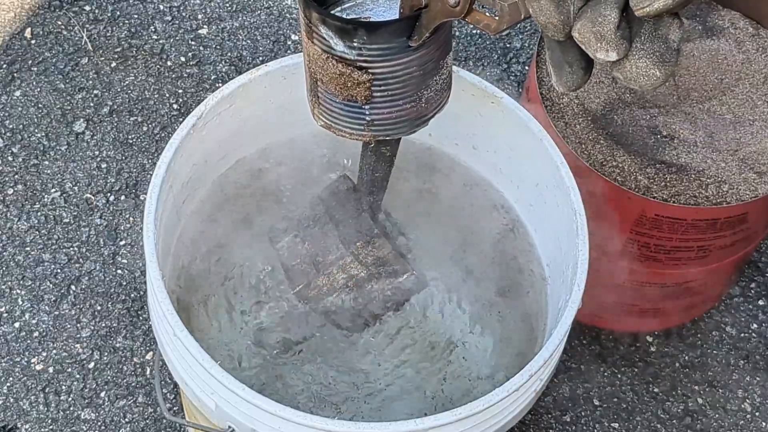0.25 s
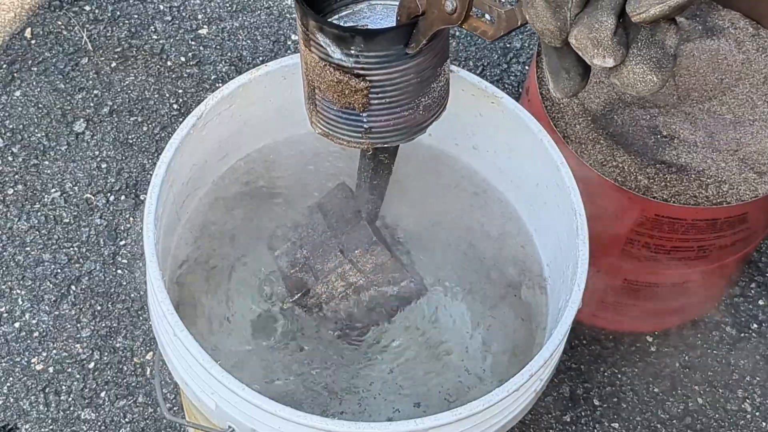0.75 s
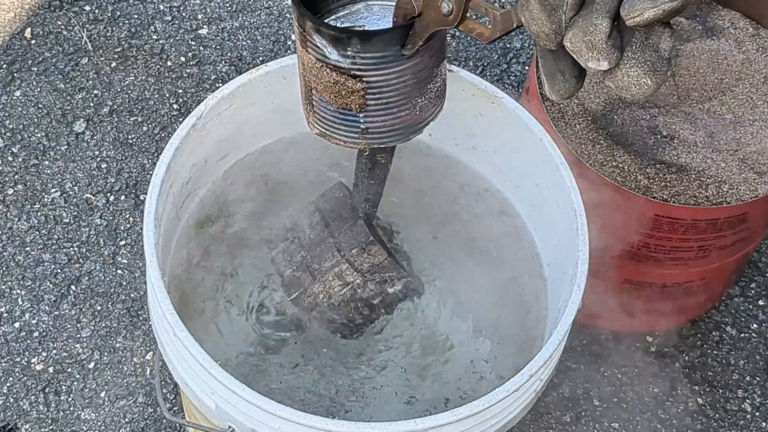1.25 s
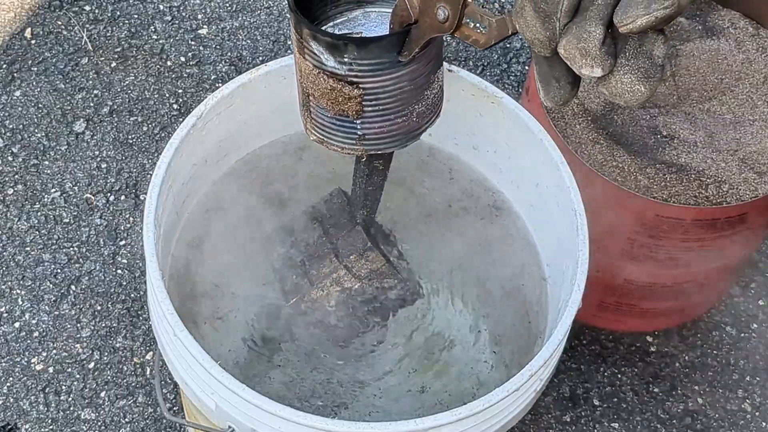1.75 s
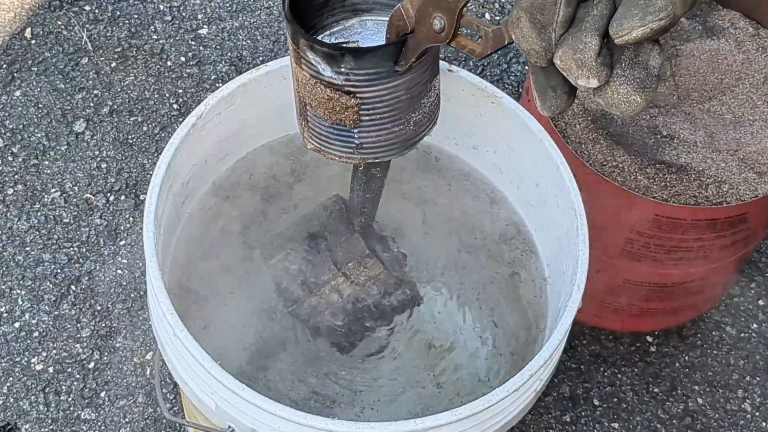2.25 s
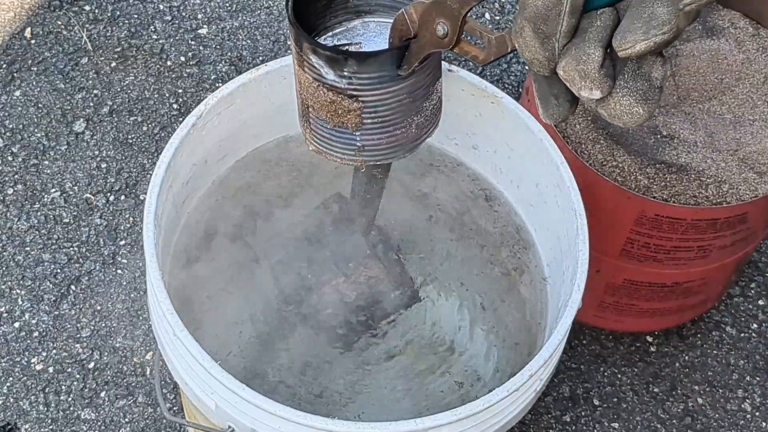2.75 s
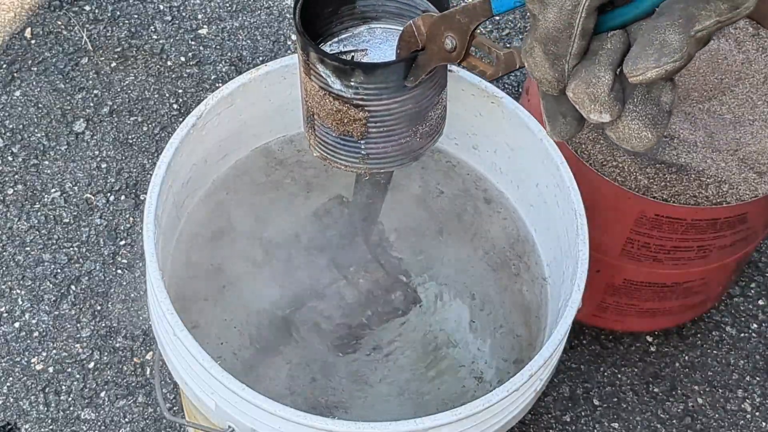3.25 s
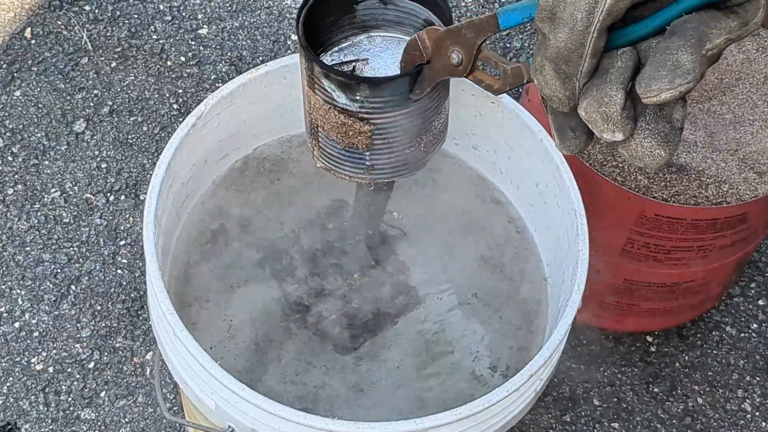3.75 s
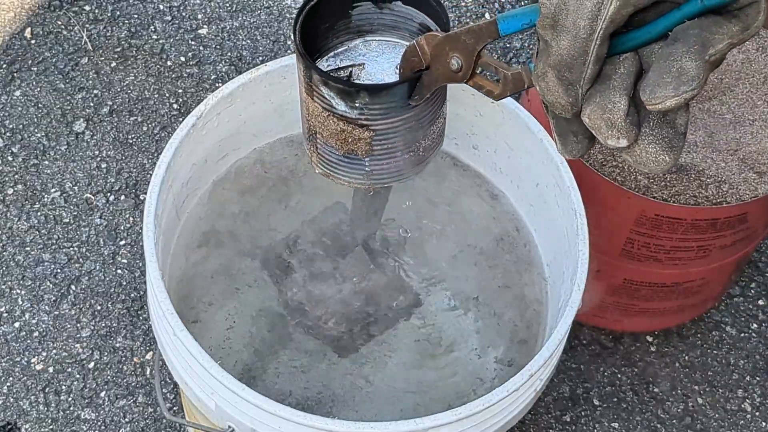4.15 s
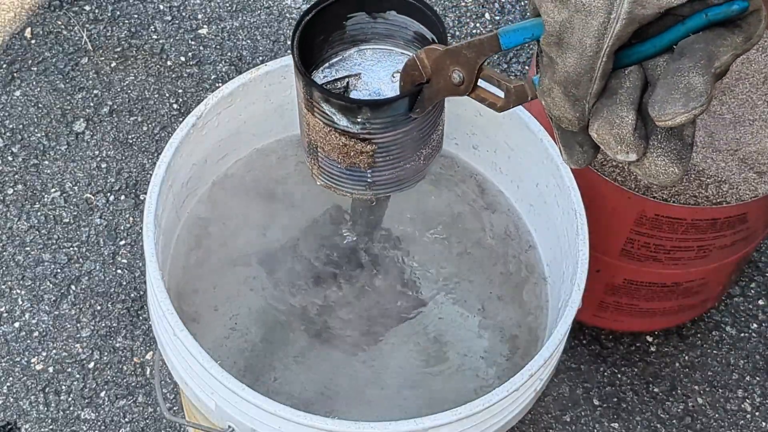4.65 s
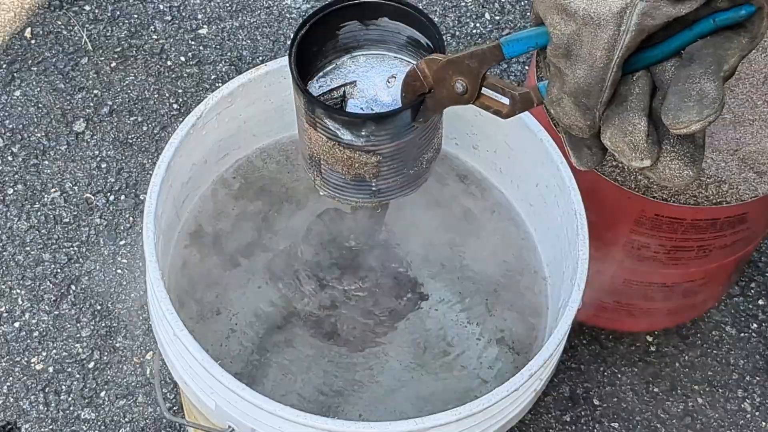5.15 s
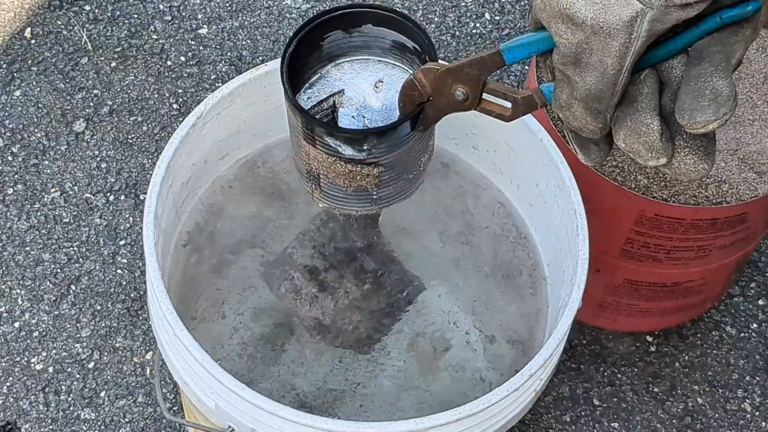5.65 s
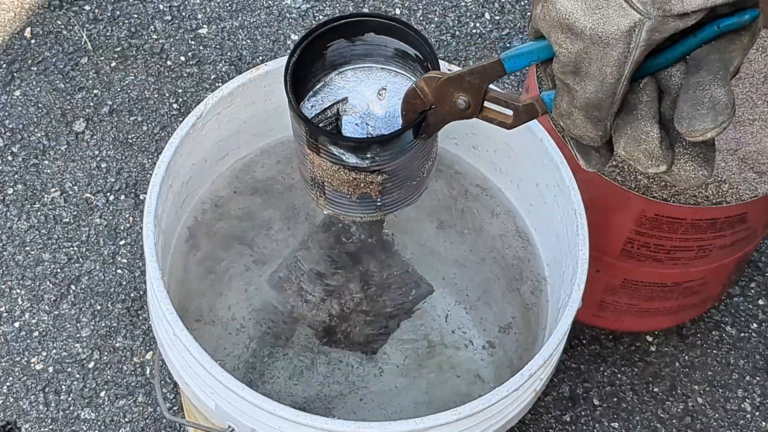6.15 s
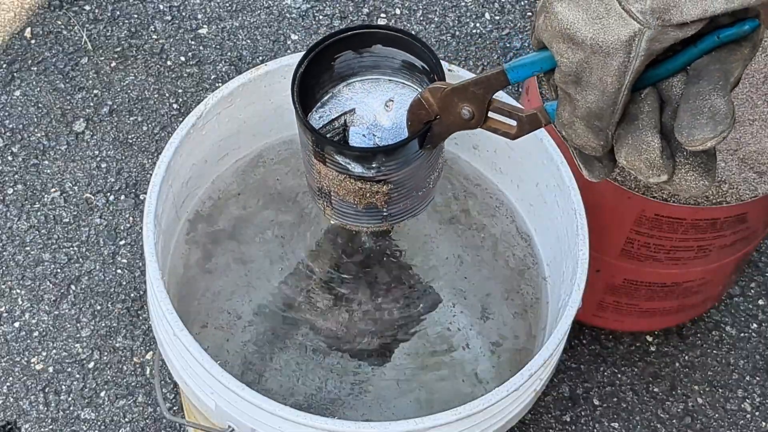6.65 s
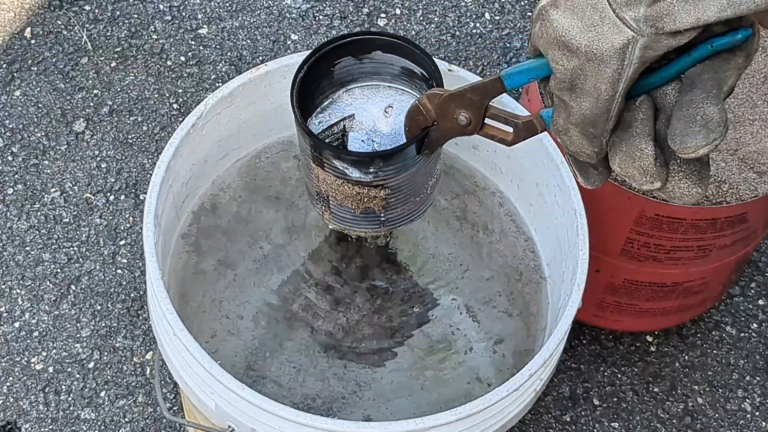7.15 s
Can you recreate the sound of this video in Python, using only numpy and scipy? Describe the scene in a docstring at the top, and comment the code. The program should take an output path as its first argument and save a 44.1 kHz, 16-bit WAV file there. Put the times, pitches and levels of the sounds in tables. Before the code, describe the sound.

From 0 s a hot metal casting in a plastic bucket of water gives a strong, bright, steady sizzle, trembling rapidly, with finer mist on top and coarser frying beneath. A hollow bucket resonance colours it, and soft low bubble knocks come at about 0.1, 0.7, 0.9 and 1.6 s, with a sharp spit near 0.4 s. From 2 to 4.3 s steam spurts, knocks and short gurgles crowd in, strongest around 2.7 and 3.2 s, while the hiss slowly weakens. Wet pops cluster at 4.6 to 4.8 s. The boiling then falls quickly to a thin, singing simmer, quietest near 5.8 s. From 6 s it picks up again, coarser, with raspy sputters, brief stalls, gurgles and pops until a steam burst at 7.4 s. Close, dry stereo outdoors, with faint low rumble, wavering drone and breeze.

```python
"""A bright, fluttering sizzle comes first: a very hot metal casting is held in a plastic bucket of water
outdoors, heard from just above. Countless tiny steam bubbles collapse on it, made from filtered random clicks.
Larger bubbles knock, gurgle, pop and ring the air in the bucket; short bursts of steam and a faint yard join in.
The boiling dies down, then picks up again, more sputtering, as the casting is shifted."""
import sys
import numpy as np
from scipy import signal
from scipy.fft import rfft, irfft
from scipy.io import wavfile
from scipy.ndimage import map_coordinates

SR = 44100
rng = np.random.default_rng(int(sys.argv[2]) if len(sys.argv) > 2 else 0)


def transcribe(u):
    """Save the signal u as a 16-bit wav file named by the first command-line argument.

    u: samples, shape (n,) or (channels, n), limited to [-1, 1]; the rate is SR.
    q: integer samples, one column per channel.
    """
    v = np.clip(np.atleast_2d(u).T, -1, 1)
    q = np.round(v * 32767).astype(np.int16)
    wavfile.write(sys.argv[1], SR, q)


N = 326340
TIME = np.arange(N) / SR
FREQ = np.maximum(np.fft.rfftfreq(N, 1 / SR), 1)
SIDES = np.array([[.5], [-.5]])  # shares out a left-minus-right difference

# In all tables, a half length is the spread (standard deviation) of a bell-shaped swell.
# Boiling as the casting cools and is shifted; coarseness is how far large bubbles gain on tiny ones:
# t/s, vigour/dB, coarseness/dB
BOILING = [(0, 0.0, 2), (1.1, -0.5, 0), (1.4, -0.6, -2), (2.3, -0.6, 1.1), (2.8, -2, 2), (3.3, -3, 0.8),
           (3.95, -4, 3.5), (4.2, -5.5, 2.5), (4.48, -6.5, 2.2), (4.6, -5, 3), (5.0, -7, 4.5),
           (5.25, -10, 2.5), (5.8, -14, 2.5), (6.03, -10, 3), (6.1, -9, 2), (6.3, -6.5, 4.5),
           (6.78, -7, 6.5), (7.05, -5, 7.5), (7.4, -7.5, 5)]
# Stalls, when steam blankets the metal for an instant: t/s, half length/s, change of vigour/dB
STALLS = [(1.744, 0.012, -2), (2.574, 0.012, -2), (2.783, 0.014, -1.5), (2.908, 0.0064, -1.5),
          (3.053, 0.0067, -1.5), (3.105, .008, -1.5), (3.763, 0.008, -0.5), (3.98, 0.009, -0.5),
          (4.58, .004, -1.5), (4.642, .008, -2.5), (4.772, .014, 0.5), (4.925, 0.013, -1),
          (6.503, 0.011, -5), (6.55, 0.0087, -2.5), (6.655, .014, -2), (6.595, .004, -3),
          (6.846, 0.0057, -4.5)]
# Spurts of steam: crest t/s, jet level/dB, half length/s, surge of the boiling/dB
SPURTS = [(0.578, -46, 0.0027, -0.5), (1.102, -42, 0.0036, 1.8), (2.102, -35, .008, 0.4),
          (2.345, -32, .006, -0.3), (2.61, -42, 0.0031, 0.5), (2.70, -30.5, .0036, -1),
          (2.75, -37, 0.0032, 0.5), (2.89, -38, 0.0035, -0.5), (3.154, -42, 0.0048, 1),
          (3.226, -29.5, 0.0046, 1.7), (3.292, -34, 0.008, 1.3), (3.557, -45, 0.0027, 1),
          (3.634, -35, 0.0065, 0.9), (3.79, -44, 0.0044, 0), (3.926, -38, 0.0032, 1),
          (4.012, -39, 0.0042, 1), (4.243, -39, .006, 0), (4.307, -37, 0.0049, -0.5),
          (4.564, -39, .004, 2.2), (4.68, -42, 0.0049, 1), (4.985, -47, 0.0033, 2), (6.08, -44, .005, 0.3),
          (6.48, -49, .004, 2.5), (6.516, -52, .003, 1), (6.6, -47, 0.0029, 3), (6.74, -52, 0.004, 0.2),
          (6.864, -46, 0.0022, 1), (6.883, -37, 0.0027, 0), (7.037, -43, .004, 0), (7.394, -34, .0046, 2)]
# A surge rises and falls this many times slower than its jet, and coarsens the bubbles (dB per dB)
SURGE_RISE, SURGE_FALL, SURGE_COARSENS = 2.8, 7.8, 0.39
# How each layer answers the boiling: starting level/dB, dB per dB of vigour, dB per dB of coarseness
FIZZ_LAW = (-36.5, 1.124, -0.49)
FRY_LAW = (-39, 1.486, -0.15)
SPATTER_LAW = (-43, 1.65, 0.25)
DEEP_LAW = (-50.5, 0.62, 1)
SIMMER_LAW = (-43, 0.84, -0.37)
CRACKLE_LAW = (-47.5, 1.9, 0)
# Coarse boiling sputters: basic flutter depth (dB), and its growth per dB of coarseness
FLUTTER_DB, FLUTTER_PER_COARSE = 1.06, 0.11
# Where the casting is held: t/s, place (0 first, 1 settled, 2 turned, 3 raised, 4 shifted)
PLACE = [(0, 0.64), (1.6, 1.06), (2.3, 0.95), (3.3, 1.7), (4.6, 1.6), (5.0, 2.6), (5.9, 2.5), (6.6, 3.46),
         (7.4, 4.15)]
# Balance of fine mist over fizz, one value for each of the five places: level/dB
MIST_DB = [4, 0.1, 1, -1, -3]
MIST_HZ = 10300  # the mist lies above this
# Colours of the three bubble sizes, tiny to large: f/Hz, level per Hz/dB
FIZZ_COLOUR = [(3000, -35), (5500, -12), (6500, -8), (7200, -2.5), (8000, -.7), (8750, -.6), (9900, -.6),
               (11200, -1.1), (12450, -.8), (13000, -3.5), (13900, -10.5), (14700, -7.3), (15300, -5.3),
               (15800, -6.5)]
FRY_COLOUR = [(1200, -35), (2400, -8.5), (3100, -19), (3600, 4), (4300, 4.5), (5300, 1.5), (6000, 4.5),
              (7000, -7), (9500, -8), (15000, -24)]
SPATTER_COLOUR = [(200, -11.5), (700, -8.5), (1130, -10), (1350, -1.5), (1550, -12), (2000, 1), (2300, -6),
                  (2800, 0), (3400, 0.5), (5000, -24)]
# Thin simmer that sings on through the lull: f/Hz, width/Hz, level/dB
SIMMER = [(8200, 930, 0), (11650, 800, -8)]
# Colour of the crackle: f/Hz, level per Hz/dB
CRACKLE_COLOUR = [(1500, -36), (3500, 1), (5300, -11), (7300, -5), (11000, 4), (14000, -21)]
# Short echoes: left delay/ms, right delay/ms, gain, share of the change of path
ECHOES = [(.42, .445, .17, 1), (.31, .315, .13, 0), (.96, .81, .12, .2), (1.23, 1.27, .14, -.3),
          (1.7, 1.58, .12, .3), (2.25, 1.92, .1, 0)]
# Change of the echo paths as the casting is lifted: t/s, extra delay/ms
PATH = [(0, 0), (3.5, -.02), (5, .02), (5.8, .06), (6.5, .02), (7.4, -.11)]
WAVER_MS, WAVER_HZ = .012, 1.2  # the rocking water makes every echo waver
# Air modes of the bucket: f/Hz, width/Hz, level/dB at each of the five places, left minus right/dB
BUCKET = [(454.5, 163, -9, -4.5, -7, -14.5, -6, 5.5), (529, 153, -8, -5, -4.5, -6, -9.5, 3),
          (904, 198, -5, -5.5, -4.5, -5, -2, -2.5), (1392, 120, 15, -16, -15, -11.5, -7.5, 3.5),
          (1708, 100, -1, -16.5, -8, -13.5, -7.5, 3.5), (1785, 137, -9, -5.5, -8.5, -16, -8, 6.5),
          (2275, 170, 9, -19, -9.5, -20, -21, 3), (2863, 185, -8, -11.5, -11.5, -21, -12, -3),
          (3514, 250, -17, -8.5, -5, -10.5, 0.5, 0), (3828, 380, -34, -5, -1, -9, -4, 0.5),
          (4510, 1300, -25, -4.5, -2, -5, -9, 5.5), (4566, 290, -24, -11.5, -16, -7, -14, -7),
          (4904, 210, -10, -12, -12, -4, -9, -8), (5310, 1200, -3, -12, -14.5, 3.5, -5, 1.5),
          (5230, 160, -16, -12, -17, -4, -15, -1)]
# Bands where the sound thins for a while: t/s, half length/s, f/Hz, width/Hz, depth (0 to 1)
THIN_BANDS = [(4.2, 1.9, 1535, 170, 0.9), (3.6, 1.1, 2084, 360, 0.7), (4.7, 1.0, 6240, 1600, 0.5),
              (5.2, 2.8, 1124, 177, 1), (5.6, 1.06, 3150, 370, 0.96), (5.7, 1.6, 2590, 330, 0.3),
              (5.6, 0.4, 6700, 1200, 0.36), (5.7, 0.45, 16000, 2200, 0.3), (6.9, 0.24, 4100, 450, 0.9)]
# Outdoor background: f/Hz, level per Hz/dB
YARD_COLOUR = [(20, -4), (45, -3), (65, -12.5), (90, -10), (130, -13.5), (180, -12), (240, -19), (340, -14),
               (520, -16), (750, -20.5), (1200, -41), (5000, -27.5)]
YARD_DB, DRONE_HZ = -49.5, 140.4
DRONE_DB, BREEZE_DB = -60.5, -62.5  # between swells, and between gusts
# Swells of the drone: crest t/s, rise/dB, half length/s
DRONE_SWELLS = [(0.547, 9, 0.062), (1.65, 4, .06), (3.45, 5, .12), (4.6, 4, 0.045), (4.88, 7, .07),
                (5.14, 11, 0.075), (6.05, 5, .06)]
# Gusts of the breeze: crest t/s, level/dB, half length/s
GUSTS = [(1.248, -52, 0.35), (2.5, -53, 0.75), (3.95, -55, 0.25)]
# Knocks of single big bubbles: t/s, peak of the main tone/dB, f/Hz, overtone against main tone/dB
KNOCKS = [(.069, -41, 484, -1), (.669, -37, 476, -12), (.888, -40, 487, -17), (1.586, -43, 503, 3),
          (2.554, -45, 520, 9.5), (2.691, -37, 450, -12), (2.829, -41, 500, 0), (2.862, -39, 440, -7),
          (3.078, -49, 450, 8.5), (3.136, -38.5, 430, -11), (3.239, -38, 467, -6), (3.281, -43, 520, -2),
          (3.583, -41, 480, -14), (3.789, -38, 476, -3), (3.887, -39, 470, -5), (4.017, -39, 427, -1),
          (4.069, -37.5, 460, -15), (4.368, -44.5, 480, -6), (4.571, -45, 444, -6), (4.764, -44, 480, -5),
          (5.084, -40.5, 480, -15), (5.437, -42, 500, -9), (6.041, -44, 480, -10), (6.163, -46, 500, 2.5)]
KNOCK_RISE_S = .0025
# Lone sharp spits: t/s, level/dB of the click before colouring
SPITS = [(.252, -35), (.378, -23), (2.152, -26), (3.693, -26), (6.572, -41)]
# Colour of a spurt or spit: f/Hz, level per Hz/dB
SPURT_COLOUR = [(300, -25), (1200, -42), (1800, -10), (2400, -25), (3800, -8), (6400, 15), (8600, 20),
                (12400, 18), (14000, -3), (15500, -8)]
# Gurgles, when a big pocket of steam heaves the water: crest t/s, level/dB, f/Hz, half length/s
GURGLES = [(2.574, -49, 520, .012), (2.625, -55, 470, .012), (2.75, -50, 410, 0.016),
           (2.891, -46, 440, 0.0086), (2.975, -57, 400, 0.014), (3.213, -46, 480, .008),
           (3.312, -47, 450, 0.018), (6.613, -56, 564, .016), (6.751, -45, 487, 0.015),
           (6.793, -49.5, 520, 0.014), (6.962, -51, 477, .014), (7.035, -49, 560, 0.016),
           (7.23, -48, 590, 0.017)]
GURGLE_WIDTH_HZ, GURGLE_OVERTONE_DB = 290, -6
# Pops of single large bubbles: t/s, starting level/dB
POPS = [(4.559, -35.5), (4.5715, -31.5), (4.595, -41), (4.6015, -36.5), (4.653, -39.5), (4.696, -40),
        (4.802, -32.5), (4.816, -34.5), (4.990, -41), (6.519, -42), (6.859, -41), (6.879, -41)]
# Colour of a pop: f/Hz, level per Hz/dB
POP_COLOUR = [(150, -14), (480, -1), (900, -2), (1150, -12), (1550, -8), (1750, 4), (2000, -3), (2300, 0),
              (2900, -6), (3600, 3), (4400, -3), (5200, -5), (6500, -14), (8500, -10), (15000, -24)]
POP_DECAY_S = .004
# Sputters on the cooling metal: crest t/s, level/dB, half length/s
SPUTTERS = [(4.96, -48, .012), (5.007, -44.5, .018), (6.085, -44.5, .012), (6.17, -49, .016),
            (6.482, -46, .004), (6.522, -44, .007), (6.622, -46, .012), (6.882, -41, .007),
            (6.98, -46, .006), (7.034, -42, .005), (7.185, -41.5, .005)]
# Colour of a sputter: f/Hz, level per Hz/dB
SPUTTER_COLOUR = [(1500, -25), (3100, -12), (3600, 0), (5300, 0), (6500, -11), (9000, -12), (15000, -24)]
# How the two microphone ports favour the treble: f/Hz, left minus right/dB
PORTS = [(2600, -1), (4700, .5), (5700, 1), (6400, -2), (7200, -2), (8000, -6), (9000, -4.5), (10000, -.5),
         (10800, 2.5), (11700, 4), (12400, 2.7), (13300, -2), (14200, 0)]
TOP_HZ = 15730  # nothing much is heard above this


def undb(db):
    """Turn decibels into gain."""
    return 10 ** (np.asarray(db) / 20)


def curves(table):
    """Join the columns of a table by straight lines in time."""
    s, *columns = np.transpose(table)
    return [np.interp(TIME, s, column) for column in columns]


def bump(s, half):
    """A bell-shaped swell around a moment."""
    return np.exp(-.5 * np.minimum(((TIME - s) / half) ** 2, 60))


def colour(points):
    """Decibels at every frequency, from a few (Hz, dB) points."""
    hz, db = np.transpose(points)
    return np.interp(np.log(FREQ), np.log(hz), db)


def resonance(hz, width):
    """A steep resonance: two equal band-passes in a row."""
    return (1 + 1j * (FREQ ** 2 - hz ** 2) / (FREQ * width)) ** -2


def shaped(x, response):
    """Filter a sound and bring its average strength (rms) to 1."""
    y = irfft(rfft(x) * response, N)
    return y / y.std()


def flutter(hz, width):
    """An uneven trembling about hz times a second, with no slow drift; spread 1."""
    return shaped(rng.standard_normal(N), resonance(hz, width))


def collapses(count, spread_db, lag=2.2, lag_spread=1.0):
    """Bubbles collapse at random as clicks of varied size; each has its own lag between ports (samples)."""
    at = rng.integers(0, N, count)
    sign = rng.choice([-1, 1], count)
    size_db = spread_db * np.minimum(rng.exponential(size=count), 2 * np.pi)
    size = sign * undb(size_db)
    late = np.rint(lag + lag_spread * rng.laplace(size=count)).astype(int)
    left = np.bincount(at, size, N)
    right = np.bincount((at + late) % N, size, N)
    return np.array([left, right])


def boiling():
    """Vigour and coarseness (dB): a spurt shifts both, quick to come and slower to go; stalls shift vigour."""
    vigour, coarse = curves(BOILING)
    surge = 0
    for s, _, half, lift_db in SPURTS:
        slower = np.where(TIME < s, SURGE_RISE, SURGE_FALL)
        surge = surge + lift_db * bump(s, half * slower)
    stall = sum(db * bump(s, half) for s, half, db in STALLS)
    return vigour + surge + stall, coarse + SURGE_COARSENS * surge


def fizz(fizz_db, mist_db, flutter_db, film):
    """The tiniest bubbles collapse in a bright fizz, with a finer mist above it."""
    clicks = collapses(count=400000, spread_db=2.1)
    upper = 1 / (1 + (MIST_HZ / FREQ) ** 20)
    tint = undb(colour(FIZZ_COLOUR))
    low_db = 1.15 - mist_db / 2 + 1.15 * flutter_db * flutter(7.5, 25)
    high_db = mist_db / 2 + 3.5 + 0.74 * flutter_db * flutter(12.0, 27)
    low = shaped(clicks, tint * (1 - upper)) * undb(low_db)
    high = shaped(clicks, tint * upper) * undb(high_db)
    return (low + high) * undb(fizz_db + 0.21 * flutter_db * film)


def sizzle(fry_db, spatter_db, flutter_db, film):
    """Two coarser sizes of bubble flutter partly with the steam film and partly alone."""
    fry_flutter = 0.14 * film + 1.36 * flutter(7.0, 36)
    spatter_flutter = 0.32 * film + 0.9 * flutter(16.6, 40)
    fry = shaped(collapses(count=120000, spread_db=0.5), undb(colour(FRY_COLOUR)))
    spatter = shaped(collapses(count=40000, spread_db=0.0), undb(colour(SPATTER_COLOUR)))
    fry = fry * undb(fry_db + flutter_db * fry_flutter)
    return fry + spatter * undb(spatter_db + flutter_db * spatter_flutter)


def simmer(simmer_db):
    """Tiny bubbles of nearly equal size sing in two narrow bands."""
    clicks = collapses(count=100000, spread_db=0.5)
    bands = sum(undb(db) * resonance(hz, width) for hz, width, db in SIMMER)
    return shaped(clicks, bands) * undb(simmer_db)


def crackle(crackle_db, film):
    """Sparser, sharper collapses grow louder and softer with the steam film."""
    clicks = collapses(count=7000, spread_db=3.0)
    return shaped(clicks, undb(colour(CRACKLE_COLOUR))) * undb(crackle_db + 0.94 * film)


def reflections(x):
    """Short echoes comb the hiss; the combs waver with the water and glide as the casting is lifted."""
    path_ms, = curves(PATH)
    out = x
    for *ports_ms, gain, share in ECHOES:
        drift_ms = share * path_ms + WAVER_MS * flutter(WAVER_HZ, 2 * WAVER_HZ)
        echo = []
        for port, ms in zip(x, ports_ms):
            source_sample = (TIME - (ms + drift_ms) / 1000) * SR
            echo.append(map_coordinates(port, [source_sample], order=2))
        out = out + gain * np.array(echo)
    return out


def bucket(boil_db, fry_db, spatter_db, place, throb_db):
    """Bubbles ring the air above the water: large ones the low modes, small ones the high."""
    large = collapses(count=14000, spread_db=0.5, lag=3.3, lag_spread=2.5) * undb(throb_db)
    fine = collapses(count=90000, spread_db=2.5, lag=2.4, lag_spread=1.9) * undb(throb_db)
    coarse_db = (fry_db + spatter_db) / 2 + 4.0
    out = 0
    for hz, width, *places_db, pan_db in BUCKET:
        small = np.clip(np.log10(hz / 460), 0, 1)  # 0 for the lowest mode, up to 1 for the high ones
        drive_db = fry_db if hz > 4100 else (1 - small) * boil_db + small * coarse_db
        # the casting's place sets the mix of the modes
        place_db = np.interp(place, np.arange(len(places_db)), places_db)
        ring = shaped(large if hz < 2100 else fine, resonance(hz, width))
        # ripples on the water make the modes come and go, the high ones most
        ripple_db = 1.9 * small * flutter(9, 20)
        out = out + ring * undb(drive_db + place_db + pan_db * SIDES + ripple_db)
    return out


def thin_bands(x):
    """Chosen bands grow weaker and recover, each around its own moment."""
    spectrum = rfft(x)
    out = x
    for s, half, hz, width, depth in THIN_BANDS:
        band = irfft(spectrum * resonance(hz, width), N)
        out = out - np.clip(depth, 0, 1) * bump(s, half) * band
    return out


def yard():
    """Distant rumble with a wavering low drone; a gusty breeze reaches each port partly on its own."""
    wind = undb(BREEZE_DB) + sum(undb(db) * bump(s, half) for s, db, half in GUSTS)
    drone_db = DRONE_DB + sum(db * bump(s, half) for s, db, half in DRONE_SWELLS)
    # noise shared by both ports, plus some of each port's own
    rumble_noise = rng.standard_normal(N) + 0.27 * rng.standard_normal((2, N))
    breeze_noise = rng.standard_normal((2, N)) + 0.96 * rng.standard_normal(N)
    rumble = shaped(rumble_noise, undb(colour(YARD_COLOUR))) * undb(YARD_DB)
    drone = shaped(rng.standard_normal(N), resonance(DRONE_HZ, 15.2)) * undb(drone_db)
    breeze = shaped(breeze_noise, resonance(27.0, 39)) * wind
    return rumble + drone + breeze


def knocks():
    """A big bubble bursts: a few cycles of its own pitch and of the bucket's third air mode."""
    out = np.zeros(N)
    t = TIME[:SR // 20]
    envelope = t / KNOCK_RISE_S * np.exp(1 - t / KNOCK_RISE_S)
    air_tone = np.sin(2 * np.pi * BUCKET[2][0] * t)
    for s, db, hz, overtone_db in KNOCKS:
        ring = np.sin(2 * np.pi * hz * t) + undb(overtone_db) * air_tone
        out[int(s * SR):][:len(t)] += undb(db) * envelope * ring
    return out


def spurts():
    """Pockets of steam break out in short dense bursts of clicks; now and then one drop spits."""
    swell = sum(undb(db) * bump(s, half) for s, db, half, _ in SPURTS)
    spits = np.zeros((2, N))
    for s, db in SPITS:
        spits[:, int(s * SR)] += undb(db)
    response = undb(colour(SPURT_COLOUR))
    jets = swell * shaped(collapses(count=120000, spread_db=-0.5), response)
    return jets + irfft(rfft(spits) * response, N)


def gurgles():
    """Each heave of the water gives a short hollow lump, with an overtone from the third air mode."""
    clicks = rfft(collapses(count=14000, spread_db=1.5, lag=2.2))
    overtone = undb(GURGLE_OVERTONE_DB) * resonance(*BUCKET[2][:2])
    out = 0
    for s, db, hz, half in GURGLES:
        lump = irfft(clicks * (resonance(hz, GURGLE_WIDTH_HZ) + overtone), N)
        out = out + lump / lump.std() * undb(db) * bump(s, half)
    return out


def pops():
    """A large bubble caves in at once, and its noise dies away within milliseconds."""
    envelope = 0
    for s, db in POPS:
        decay = np.exp(-np.clip((TIME - s) / POP_DECAY_S, 0, 30))
        envelope = envelope + undb(db) * (TIME >= s) * decay
    return envelope * shaped(collapses(count=120000, spread_db=-1.0), undb(colour(POP_COLOUR)))


def sputters():
    """Water wets a hot patch of the cooling metal and fries off in a short rasp."""
    swell = sum(undb(db) * bump(s, half) for s, db, half in SPUTTERS)
    return swell * shaped(collapses(count=60000, spread_db=3.5), undb(colour(SPUTTER_COLOUR)))


def scene():
    """The boiling casting in its bucket, in the open air."""
    vigour, coarse = boiling()
    laws = (FIZZ_LAW, FRY_LAW, SPATTER_LAW, DEEP_LAW, SIMMER_LAW, CRACKLE_LAW)
    fizz_db, fry_db, spatter_db, boil_db, simmer_db, crackle_db = (
        db + per_vigour * vigour + per_coarse * coarse for db, per_vigour, per_coarse in laws)
    flutter_db = FLUTTER_DB + FLUTTER_PER_COARSE * np.maximum(coarse, 0)
    place, = curves(PLACE)
    mist_db = np.interp(place, np.arange(len(MIST_DB)), MIST_DB)
    # the film of steam on the metal swells and breaks many times a second
    film = flutter(11.7, 56) + 0.2 * flutter(79, 120)
    throb_db = flutter_db * (0.34 * film + .5 * flutter(21.8, 25))
    hiss = fizz(fizz_db, mist_db, flutter_db, film)
    hiss = hiss + sizzle(fry_db, spatter_db, flutter_db, film)
    hiss = hiss + simmer(simmer_db) + crackle(crackle_db, film)
    ring = bucket(boil_db, fry_db, spatter_db, place, throb_db)
    in_bucket = thin_bands(reflections(hiss) + ring)
    return in_bucket + yard() + knocks() + spurts() + gurgles() + pops() + sputters()


def record(dry):
    """Each microphone port colours the treble in its own way; a steep low-pass cuts off the top."""
    heard = irfft(rfft(dry) * undb(colour(PORTS) * SIDES), N)
    low_pass = signal.ellip(12, .1, 80, TOP_HZ, fs=SR, output="sos")
    return signal.sosfilt(low_pass, heard)


dry = scene()
out = record(dry)
transcribe(out)
```